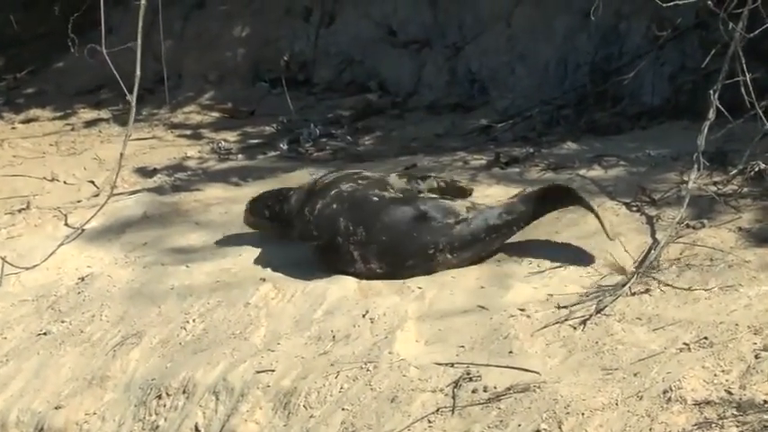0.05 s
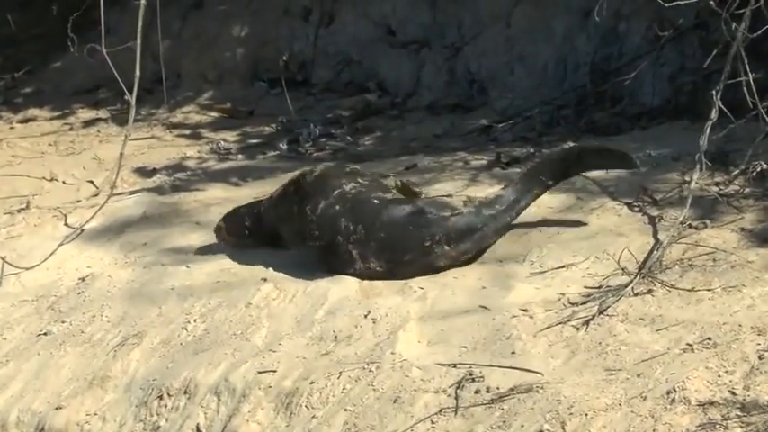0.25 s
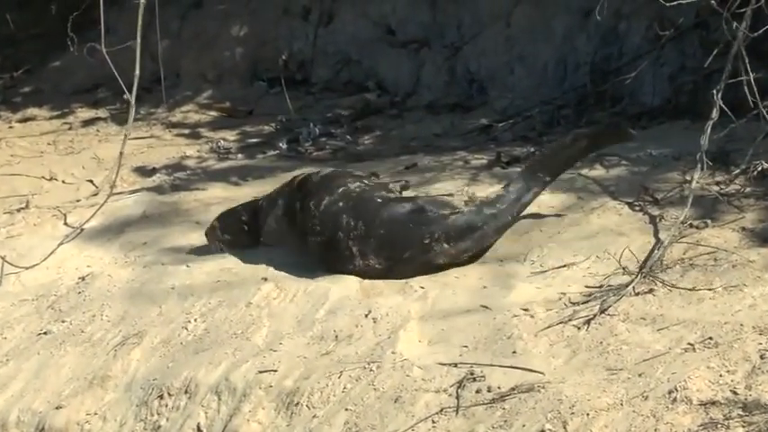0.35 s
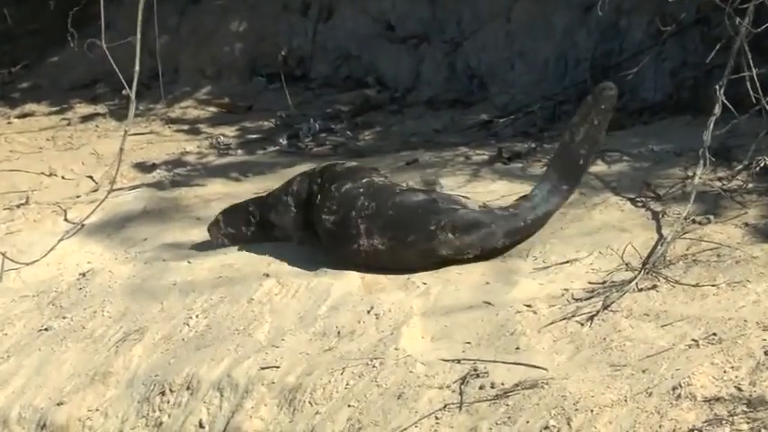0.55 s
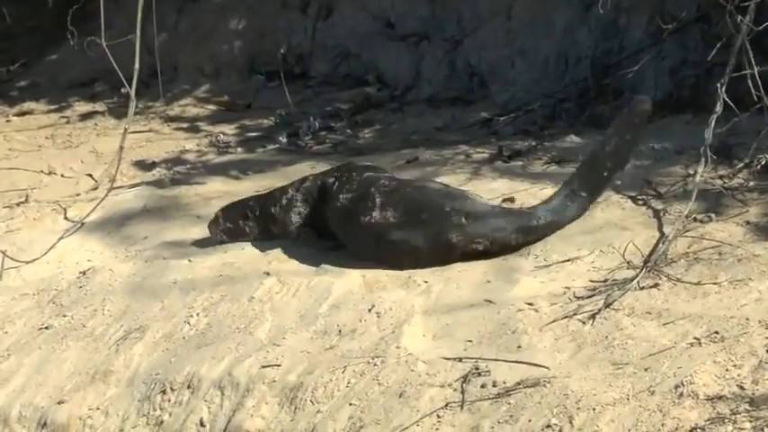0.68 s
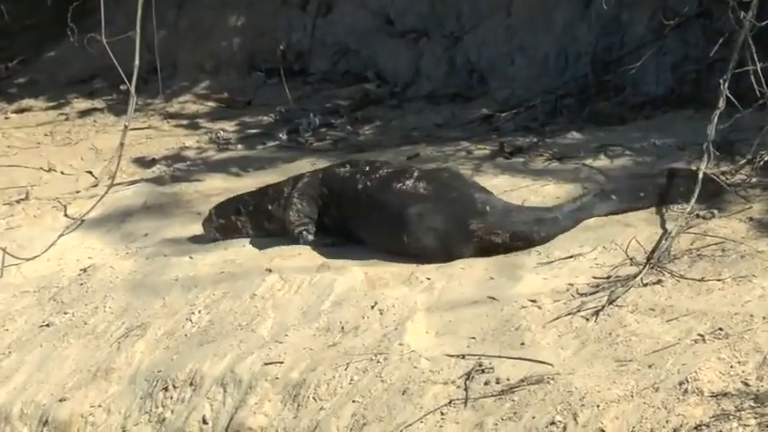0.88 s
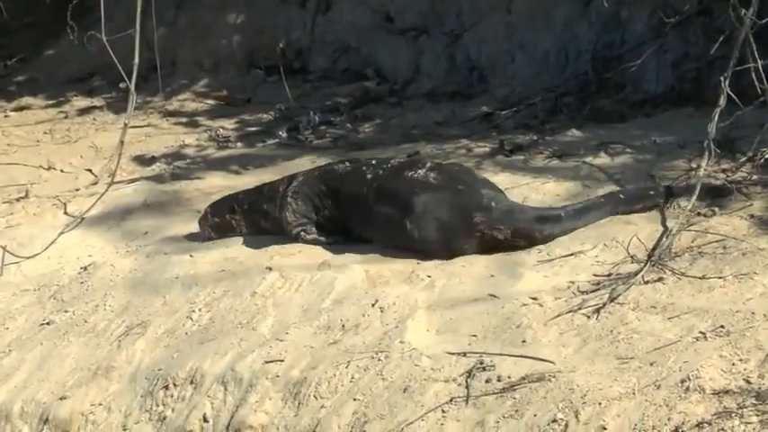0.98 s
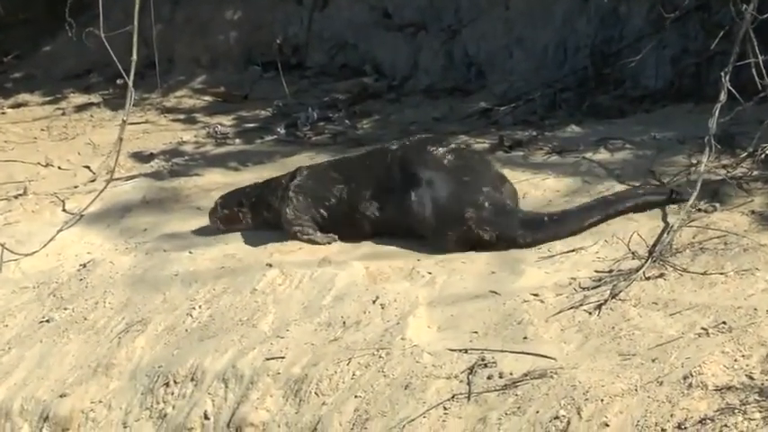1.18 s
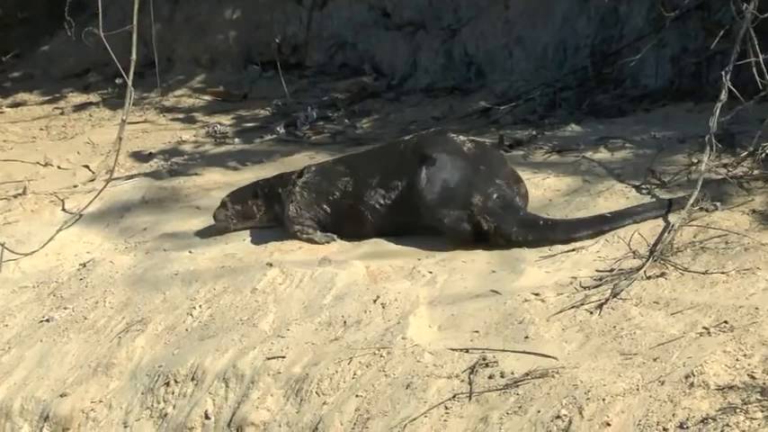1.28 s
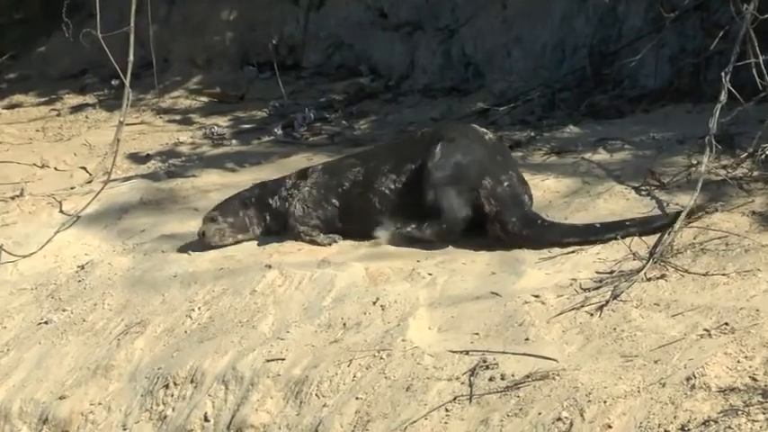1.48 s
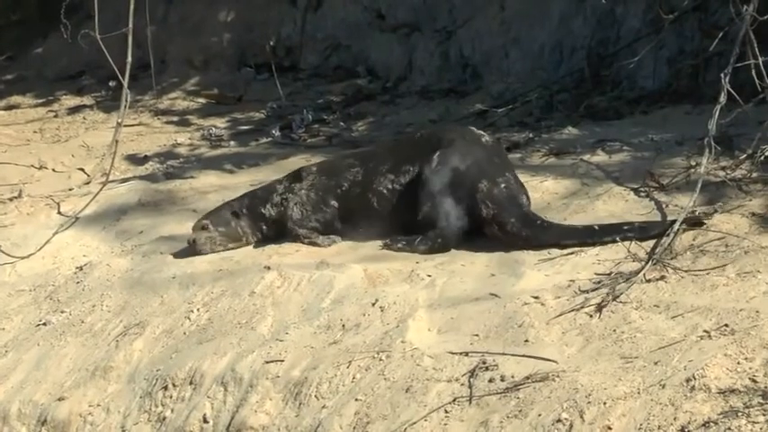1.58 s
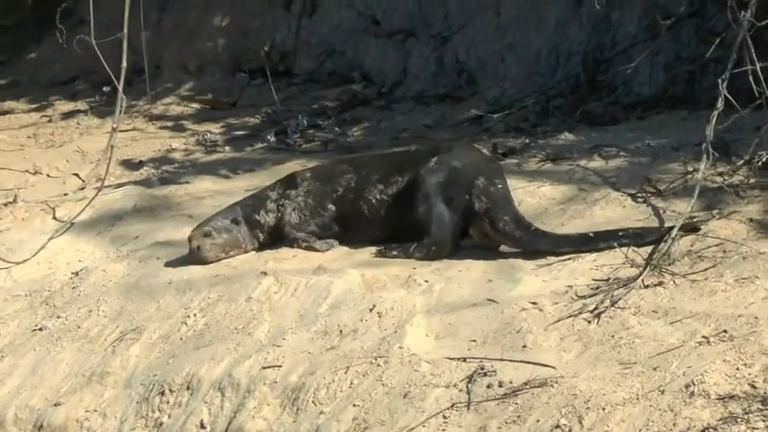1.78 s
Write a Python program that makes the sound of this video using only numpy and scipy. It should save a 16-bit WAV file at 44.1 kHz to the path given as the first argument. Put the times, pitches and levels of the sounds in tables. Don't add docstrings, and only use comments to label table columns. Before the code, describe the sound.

A close camera shutter fires outdoors. After quiet air, three rapid clattering clacks run from about 0.23 to 0.47 seconds, crisp and metallic with a small hollow knock and gear chatter. Faint ticks follow; near 1.15 a tiny squeak and soft focus whirr lead into two more clacks, 1.27 to 1.43. Soft echoes fade into faint ticks, thin insect buzz and distant engine hum.

```python
import sys
import numpy as np
from scipy import signal
from scipy.fft import rfft, irfft
from scipy.io import wavfile
from scipy.ndimage import uniform_filter1d

SR = 44100
rng = np.random.default_rng(int(sys.argv[2]) if len(sys.argv) > 2 else 0)


def pcm_store(signal):
    levels = np.round(np.clip(np.atleast_2d(signal), -1, 1) * 32767)
    wavfile.write(sys.argv[1], SR, levels.astype(np.int16).T)


def invert_db(x):
    u = np.asarray(x, float) / 20
    return 10 ** u


N = 81585

# pitch_hz, level_db (per Hz)
AIR_MIDDLE_TONE = [(25, -20), (217, -1), (520, -11), (700, -12), (858, -11), (930, -21), (2210, -14),
                   (15800, -32)]
AIR_SIDE_TONE = [(15, -37), (25, -7), (382, -7), (425, 1), (487, -15), (542, -5), (655, -22), (1930, -25),
                 (15800, -53)]
# pitch_hz, width_hz, middle_level_db, side_level_db
ENGINE_HUMS = [(436, 14, -76, -69), (565, 30, -83, -82), (150, 70, -76, -78), (340, 120, -72, -74),
               (1060, 30, -88, -92)]
# start_s, pitch_hz, level_db, fade_60db_s
TICKS = [(.209, 3600, -60, .04), (.600, 2800, -63, .04), (.685, 4000, -63, .04), (.730, 3250, -60, .06),
         (.760, 4750, -64, .04), (.810, 5900, -62, .04), (.811, 1420, -62, .05), (1.004, 2350, -61, .06),
         (1.008, 3350, -63, .05), (1.188, 2750, -59, .04), (1.21, 2800, -61, .05), (1.48, 2950, -60, .06),
         (1.63, 1800, -63, .05), (1.72, 2300, -61, .05), (1.66, 220, -54, .12), (1.72, 350, -57, .08)]
# start_s, peak_db, body_thump_db (relative to the peak)
MIRROR_LIFTS = [(.2255, -32, -26), (.2288, -29, -24), (.233, -31, -22), (.2405, -31, -22), (.248, -36, -22),
                (.323, -31, -18), (.329, -31, -20), (.338, -33, -20), (.3935, -31, -22), (.399, -29, -20),
                (.4065, -30, -21), (1.2735, -35, -24), (1.2775, -29, -24), (1.289, -31, -21),
                (1.296, -38, -19), (1.3705, -32, -20)]
# start_s, peak_db, body_thump_db (relative to the peak)
CURTAIN_OPENS = [
    (0.2788, -25, -21),
    (0.3511, -29, -20),
    (0.4218, -25, -19),
    (1.328, -26, -20),
    (1.3748, -28, -16),
]
# start_s, peak_db, body_thump_db (relative to the peak)
CURTAIN_CLOSES = [
    (0.2924, -26, -24),
    (0.3634, -28, -22),
    (0.4354, -26, -23),
    (1.3414, -28, -16),
    (1.3894, -28, -22),
]
# start_s, peak_db, body_thump_db (relative to the peak)
MIRROR_DROPS = [
    (0.3174, -29, -18),
    (0.3887, -28, -17),
    (0.46, -27, -27),
    (1.3666, -28, -15),
    (1.4144, -27, -29),
]
# pitch_hz, level_db (per Hz)
LIFT_TONE = [(200, -27), (640, -13), (1200, -15), (1670, -5), (3280, -2), (6580, -12), (8970, -21),
             (15800, -28)]
OPEN_TONE = [(200, -26), (680, -8), (1220, -16), (1730, -8), (3110, -1.5), (3600, -7), (4650, -7),
             (15800, -27)]
CLOSE_TONE = [(200, -24), (680, -8), (1200, -11), (3000, -1.5), (8650, -8), (9480, -15), (10600, -15),
              (15800, -19)]
DROP_TONE = [(200, -24), (600, -11), (1020, -14), (2080, .5), (4010, -3), (5090, -10), (8000, -18),
             (15800, -30)]
GEAR_TONE = [(200, -26), (640, -12), (1200, -14), (1670, -5), (3100, -1.5), (7600, -8), (9000, -15),
             (15800, -22)]
# start_s, end_s, level_db
GEAR_RUNS = [
    (.226, .256, -4),
    (.277, .472, 0),
    (1.275, 1.305, -3),
    (1.323, 1.428, -1.2),
    (.256, .277, -14),
    (1.305, 1.325, -10),
]
# start_s, hollow_peak_db, upper_peak_db, low_peak_db
SHELL_BLOWS = [(.227, -54, -59, -63), (.237, -54, -55, -53), (.255, -56, -66, -66), (.279, -46, -55, -60),
               (.302, -50, -57, -57), (.324, -49, -58, -52), (.346, -47, -56, -57), (.371, -56, -55, -61),
               (.388, -53, -62, -58), (.396, -49, -53, -51), (.421, -44, -54, -58), (.436, -52, -52, -54),
               (.446, -50, -60, -62), (.461, -57, -70, -60), (1.276, -54, -57, -57), (1.286, -53, -53, -51),
               (1.304, -54, -62, -62), (1.327, -46, -55, -62), (1.335, -46, -56, -56),
               (1.351, -49, -62, -66), (1.375, -43, -50, -58), (1.392, -48, -55, -55),
               (1.406, -54, -66, -62), (1.416, -59, -66, -59)]
# pitch_hz, fade_60db_s
SHELL_TONES = [(587, .066), (795, .04), (288, .046)]
# start_s, peak_db, centre_hz
SNAPS = [(.2288, -42, 11000), (.2343, -33, 3000), (.2417, -33, 3300), (.2477, -44, 9500),
         (.2505, -50, 9000), (.2818, -31, 3000), (.2955, -32, 3500), (.3181, -47, 10000),
         (.3512, -43, 11000), (.3527, -34, 3000), (.3655, -40, 8500), (.3684, -42, 9500),
         (.3717, -39, 5000), (.3784, -50, 9000), (.3957, -44, 10000), (.4004, -33, 3000),
         (.4075, -33, 3000), (.414, -49, 9500), (.4232, -34, 3000), (.4376, -33, 3500), (.4459, -48, 9000),
         (.468, -44, 3000), (1.2778, -46, 10500), (1.2903, -35, 3000), (1.3303, -31, 3000),
         (1.3423, -37, 4500), (1.3709, -36, 3000), (1.376, -34, 3000), (1.3795, -48, 10000),
         (1.3898, -36, 5000), (1.3938, -41, 9000), (1.4001, -48, 9000), (1.4208, -37, 4000),
         (1.428, -45, 3500)]
# pitch_hz, width_hz, level_db
BODY_RINGS = [(790, 90, -4), (1100, 90, -6), (1400, 80, 2.5), (1780, 70, -1), (2030, 60, 1.5),
              (2410, 120, -6), (2800, 140, -4), (3110, 80, 3), (3900, 120, -3), (4310, 110, .5),
              (4700, 140, .5), (5650, 140, -3), (6330, 140, -3), (8340, 160, -4)]
# pitch_hz, width_hz, depth (0 to 1)
HOUSING_DIPS = [(960, 160, .6), (1270, 120, .4), (1560, 110, .6)]


def level(x, db):
    return x * invert_db(db) / np.sqrt(np.mean(x ** 2))


def colour(x, points):
    hz, db = np.array(points, float).T
    grid_hz = np.arange(1025) * SR / 2048
    log_gain = np.interp(np.log(grid_hz + 1), np.log(hz), db) * np.log(10) / 20
    cepstrum = irfft(log_gain)
    cepstrum[1:1024] *= 2
    cepstrum[1025:] = 0
    taps = irfft(np.exp(rfft(cepstrum)))[:1024]
    return signal.fftconvolve(x, taps / np.sqrt(np.sum(taps ** 2)))[:N]


def band(x, hz, width_hz):
    return signal.lfilter(*signal.iirpeak(hz, hz / width_hz, SR), x)


def walk(rate_hz):
    hold = int(SR / rate_hz)
    steps = np.repeat(rng.standard_normal(600), hold)[:N]
    return 1.3 * uniform_filter1d(uniform_filter1d(steps, hold), hold)


def rattle():
    impacts_per_s, spread_db = 14000, 2.5
    chance, side, luck = rng.random((3, N))
    sign = np.sign(side - .5)
    size_db = np.minimum(spread_db * -np.log(luck + 1e-9), 8)
    return level((chance < impacts_per_s / SR) * sign * invert_db(size_db), 0)


def scatter(x, t60_s, onset_s, top_hz):
    t = np.arange(SR // 2) / SR
    tail = rng.standard_normal(len(t)) * (1 - np.exp(-t / onset_s)) * invert_db(-60 * t / t60_s)
    tail = tail / np.sqrt(np.sum(tail ** 2))
    tail = signal.lfilter(*signal.butter(1, top_hz, fs=SR), tail)
    return signal.fftconvolve(x, tail)[:N]


def air(tone, db):
    spectrum = rfft(colour(rng.standard_normal(N), tone))
    hz = np.arange(N // 2 + 1) * SR / N
    spectrum = spectrum * np.minimum(hz / 55, 1)
    octave = np.log2(np.maximum(hz, 30) / 30)
    swell = walk(1.5)
    out = np.zeros(N)
    for k in range(11):
        one_octave = irfft(spectrum * np.clip(1 - abs(octave - k), 0, 1), N)
        out += one_octave * invert_db(.7 * swell + 1.2 * walk(9))
    return level(out, db)


def engine():
    middle, side = np.zeros(N), np.zeros(N)
    for hz, width_hz, middle_db, side_db in ENGINE_HUMS:
        middle += level(band(rng.standard_normal(N), hz, width_hz), middle_db)
        side += level(band(rng.standard_normal(N), hz, width_hz), side_db)
    pitch_hz = 873.5 + .3 * walk(4)
    tone = np.sin(2 * np.pi * np.cumsum(pitch_hz) / SR) * invert_db(.6 * walk(8))
    return middle + invert_db(-71.5) * tone, side + invert_db(-82) * tone


def insects():
    pitch_hz, width_hz = 7100, 660
    throb = invert_db(1.5 * walk(90) + 1.5 * walk(3))
    buzz = band(rng.standard_normal(N) * throb, pitch_hz, width_hz)
    return level(band(buzz, pitch_hz, width_hz), -77)


def ticks():
    t, out = np.arange(N) / SR, np.zeros(N)
    crack = band(rng.standard_normal(N), 4000, 6000)
    for s, hz, db, t60_s in TICKS:
        age = np.maximum(t - s, 0)
        glide = 1 + .04 * (1 - age / .02)
        ring = np.sin(2 * np.pi * hz * age * glide)
        ring = ring * invert_db(-60 * age / t60_s) * (1 - np.exp(-age / .0015))
        snap = (age > 0) * (hz > 1000) * invert_db(-4 - 60 * age / .04) * crack
        out += invert_db(db + 1.5) * (ring + snap)
    return out


def moving_part(events, tone, lead_s, attack_s, t60_s, knock_db, gain_db):
    t, shake = np.arange(N) / SR, rattle()
    clatter, push = np.zeros(N), np.zeros(N)
    for s, db, thump_db in events:
        age = np.maximum(t - s + lead_s, 0)
        hit = shake * (1 - np.exp(-age / attack_s)) ** 2 * invert_db(-60 * age / t60_s)
        hit[int(s * SR) + 1] += 2 * invert_db(knock_db)
        clatter += hit * invert_db(db + gain_db)
        push += hit * invert_db(db + gain_db + thump_db)
    return np.array([colour(clatter, tone), push])


def mirror_and_curtains():
    lift = moving_part(MIRROR_LIFTS, LIFT_TONE, lead_s=0.0, attack_s=.001, t60_s=.037, knock_db=-5, gain_db=-5.8)
    opening = moving_part(CURTAIN_OPENS, OPEN_TONE, lead_s=.004, attack_s=.006, t60_s=.03,
                          knock_db=-16, gain_db=6.5)
    closing = moving_part(CURTAIN_CLOSES, CLOSE_TONE, lead_s=.001, attack_s=.0026, t60_s=.028,
                          knock_db=-12, gain_db=3)
    drop = moving_part(MIRROR_DROPS, DROP_TONE, lead_s=0.0, attack_s=.0005, t60_s=.012,
                       knock_db=-.5, gain_db=-2.5)
    return lift + opening + closing + drop


def gears():
    t, run = np.arange(N) / SR, np.zeros(N)
    for start_s, end_s, db in GEAR_RUNS:
        run += invert_db(db) * np.clip(np.minimum(t - start_s, end_s - t) / .005, 0, 1)
    return colour(rattle() * run * invert_db(-49 + 3.0 * walk(200)), GEAR_TONE)


def shell_thumps():
    t, out = np.arange(4096) / SR, np.zeros(N + 4096)
    for s, *levels_db in SHELL_BLOWS:
        for (hz, t60_s), db in zip(SHELL_TONES, levels_db):
            cycles = hz * (s + (1 + .018 * rng.standard_normal()) * t) + .17 * rng.standard_normal()
            fade = invert_db(db + 6 - 60 * t / t60_s) * (1 - np.exp(-t / .003))
            out[int(s * SR):][:len(t)] += fade * np.sin(2 * np.pi * cycles)
    return out[:N]


def lever_snaps():
    t, out = np.arange(4096) / SR, np.zeros(N + 4096)
    for s, db, hz in SNAPS:
        grit = rng.standard_normal(len(t)) * invert_db(-60 * t / .01)
        grit = band(band(grit, hz, .9 * hz), hz, .9 * hz)
        out[int(s * SR):][:len(t)] += invert_db(db + 1.5) * grit / abs(grit).max()
    return out[:N]


def camera():
    clatter, push = mirror_and_curtains()
    clatter = clatter + lever_snaps() + gears()
    ring = np.zeros(N)
    for hz, width_hz, db in BODY_RINGS:
        ring += invert_db(db - 2.5) * band(clatter, hz, width_hz)
    boom = invert_db(11.5) * (1.3 * band(push, 500, 80) + .7 * band(push, 700, 80))
    boom += invert_db(6) * band(push, 290, 50)
    boom += invert_db(8) * band(push, 115, 40)
    return invert_db(-1.2) * clatter + ring + invert_db(13) * boom + shell_thumps()


def squeak():
    start_s, end_s, from_hz, to_hz = 1.14, 1.19, 5600, 3500
    along = np.clip((np.arange(N) / SR - start_s) / (end_s - start_s), 0, 1)
    pitch_hz = from_hz + (to_hz - from_hz) * along
    return invert_db(-73) * np.sin(np.pi * along) ** .5 * np.sin(2 * np.pi * np.cumsum(pitch_hz) / SR)


def focus_whirr():
    t, start_s, end_s = np.arange(N) / SR, 1.165, 1.275
    chatter = level(band(rattle(), 3800, 3200) * invert_db(3.0 * walk(50)), -62)
    return np.clip(np.minimum((t - start_s) / .05, (end_s - t) / .005), 0, 1) * chatter


def scene():
    shutter = camera()
    near = shutter + ticks() + squeak() + focus_whirr()

    treble = signal.sosfilt(signal.butter(4, 7500, "high", fs=SR, output="sos"), shutter)
    wide = invert_db(-16.5) * scatter(near, .03, .0005, 4000)
    wide += invert_db(-4.5) * scatter(treble * walk(250), .05, .0005, 16000)

    sent = near - .7 * band(near, 584, 200) - .6 * band(near, 1100, 300) - .4 * band(near, 3000, 800)
    echo, echo_side = (invert_db(-13) * scatter(sent, .34, .01, 18000) for _ in range(2))

    engine_middle, engine_side = engine()
    air_side = signal.sosfilt(signal.ellip(8, .5, 50, 7300, fs=SR, output="sos"), air(AIR_SIDE_TONE, -62))
    far_side = air_side + engine_side
    far_middle = air(AIR_MIDDLE_TONE, -63) + engine_middle + insects()

    middle = near + echo + far_middle - invert_db(-17) * far_side
    lean = invert_db(-11.5) * band(near, 700, 1800)
    side = wide + invert_db(-8) * echo_side - lean + far_side
    return np.array([middle + side, middle - side])


def top_cut(x):
    return signal.sosfilt(signal.butter(12, 15970, fs=SR, output="sos"), x)


def record(dry):
    mix = signal.sosfilt(signal.ellip(10, .3, 60, 15900, fs=SR, output="sos"), dry)
    for hz, width_hz, depth in HOUSING_DIPS:
        mix = mix - depth * band(mix, hz, width_hz)
    return top_cut(mix)


dry = scene()
out = record(dry)
pcm_store(out)
```